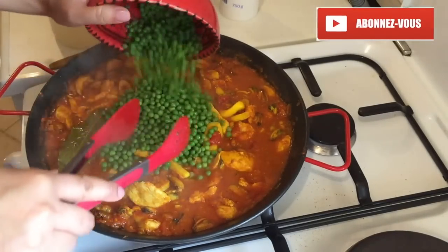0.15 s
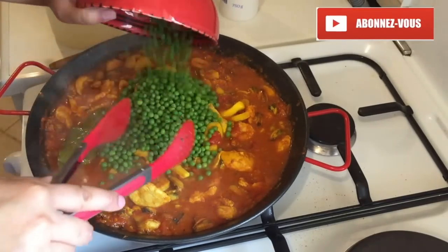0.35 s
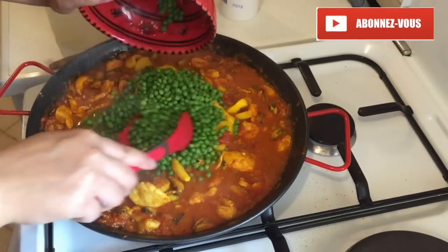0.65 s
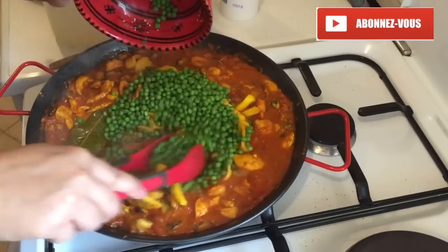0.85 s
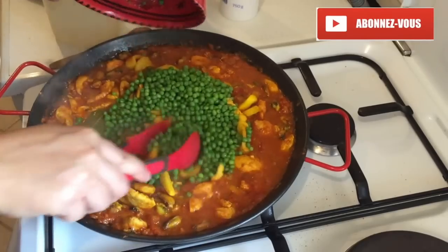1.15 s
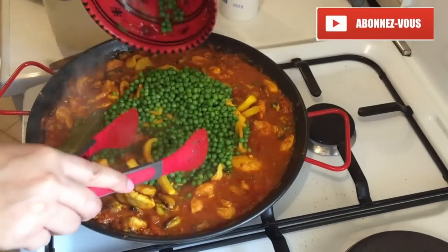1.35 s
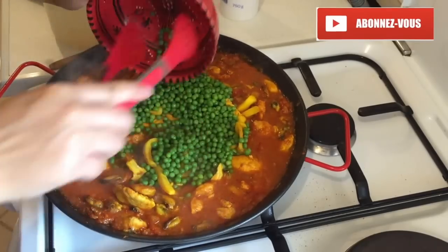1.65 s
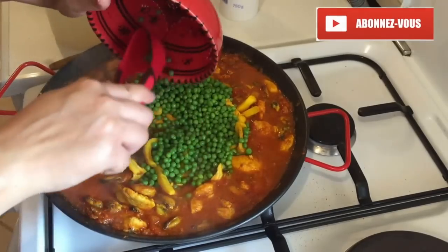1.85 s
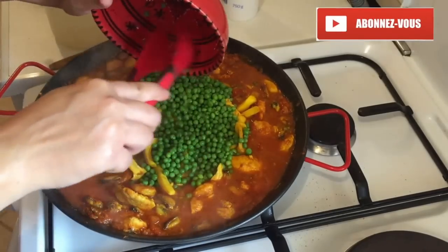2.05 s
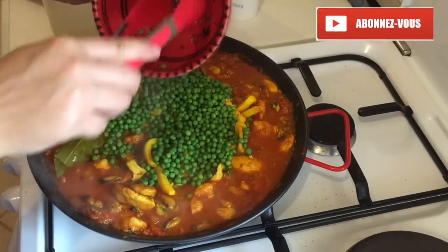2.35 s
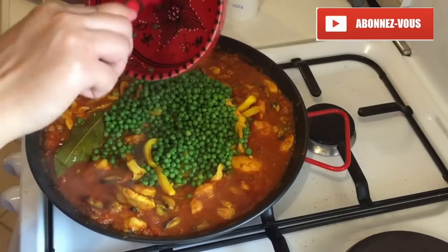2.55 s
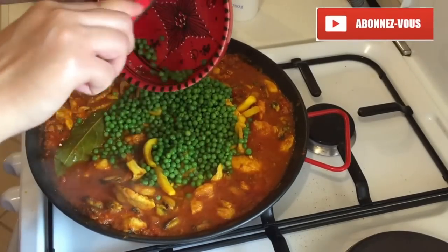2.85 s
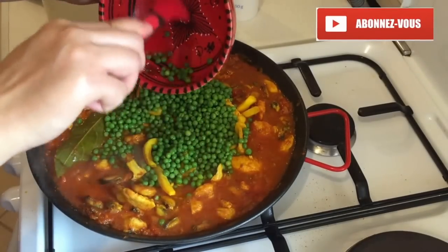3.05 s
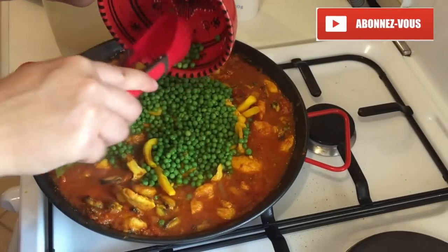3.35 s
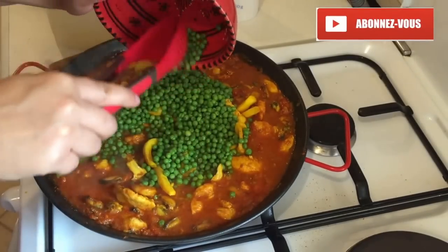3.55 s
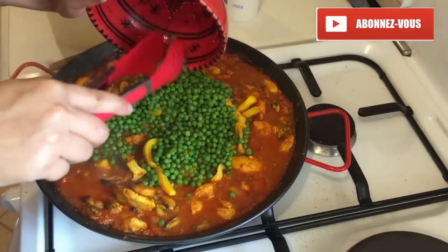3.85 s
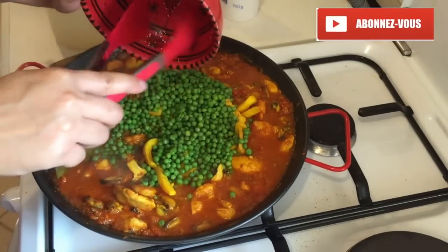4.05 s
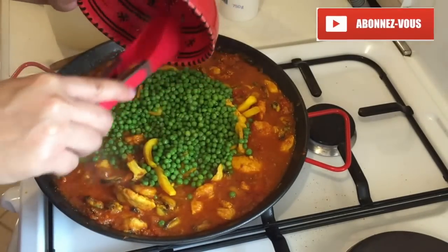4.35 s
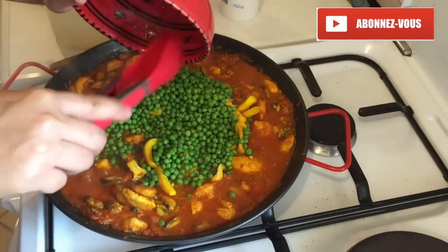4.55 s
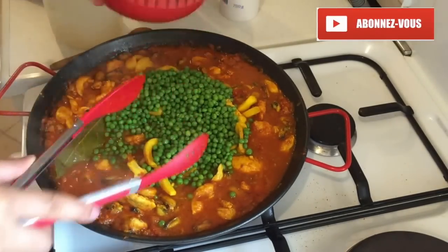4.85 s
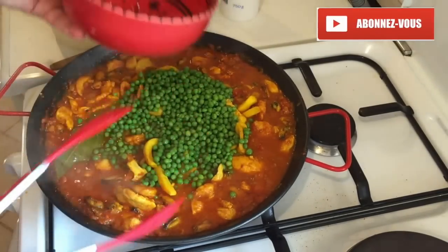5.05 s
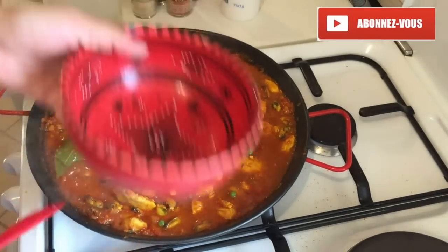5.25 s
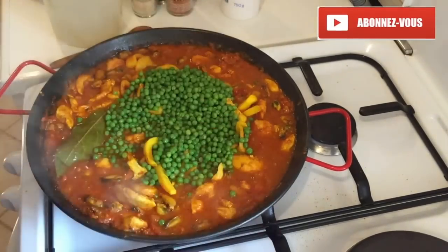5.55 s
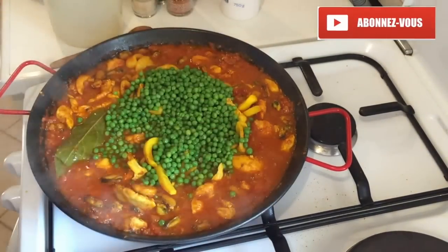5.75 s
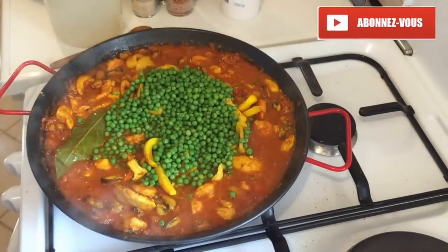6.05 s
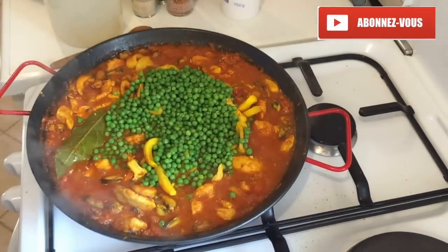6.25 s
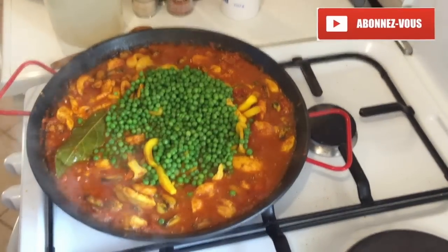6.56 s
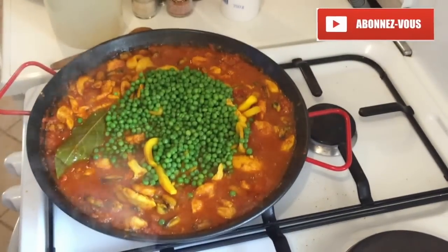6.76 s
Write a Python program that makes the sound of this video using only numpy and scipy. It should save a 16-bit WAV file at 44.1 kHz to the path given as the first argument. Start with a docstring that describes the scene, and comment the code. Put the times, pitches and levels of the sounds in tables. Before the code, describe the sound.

Over a gently fizzing pan, utensils clank on steel, thud in stew, then tap rapidly in a plastic colander before it is set down.

```python
"""Peas, tongs and a simmering pan

Peas are tipped from a plastic colander into a steel pan in a small kitchen. Silicone-tipped tongs stir, thud,
knock and pick out the last peas; then the utensils are put down on the worktop. Blows are decaying modes plus a
noise contact and a room tail; stew, squelch and a dull low rumble are shaped noise, grains and rising bubble
tones. A gas burner rushes and a fan hums."""
import sys
import numpy as np
from scipy import signal
from scipy.fft import rfft, irfft, next_fast_len
from scipy.io import wavfile
from scipy.ndimage import uniform_filter1d, map_coordinates

SR = 44100
rng = np.random.default_rng(int(sys.argv[2]) if len(sys.argv) > 2 else 0)


def generate_wav(signal):
    """Clip the signal to [-1, 1] and save it as 16-bit WAV at the path in sys.argv[1]."""
    frames = np.transpose(np.atleast_2d(signal))
    scaled = np.clip(frames, -1, 1) * 32767
    pcm = np.round(scaled).astype(np.int16)
    wavfile.write(sys.argv[1], SR, pcm)


N = 305172
TIME_S = np.arange(N) / SR
AGE_S = np.arange(SR // 2) / SR  # time since a blow
TOP_HZ = 16200

# Blows on the pan rim. Each row: start in seconds, level in dB, main mode in Hz, lightness (bass loss) and
# softness (treble loss) in dB per octave, relative ring in dB, ring time factor, relative rattle in dB,
# favoured modes as a list of (Hz, lift in dB).
RIM_BLOWS = [(0.3356, -17, 3700, 5.35, 9.2, -0.5, 1.18, 1.5, [(2980, 15), (4460, 7), (3472, -2),
             (4930, 5.5)]), (0.358, -32, 4520, 0.95, 6, -5, 1, -2, [(5930, 8), (4560, 7)]),
             (0.7243, -21, 1330, 1.6, 5.9, -6.5, .75, -23, [(1490, 6), (1112, 5), (1943, 3), (4888, 13.5),
             (7520, 12)]), (2.1068, -19.5, 4750, 2.1, 8.2, -1, 1.06, -33, [(275, 2), (1760, 13),
             (3004, 4.5), (3806, 3), (4560, 7), (5970, 6.5), (7500, 4.5), (8834, 8)]),
             (2.3437, -14, 3800, .3, 9.5, 3.5, 0.87, -15, [(2940, 10), (1943, 7.5), (3830, 6), (4900, 7),
             (6850, 7), (7520, 2.5), (9255, 7), (10010, 6)]),
             (2.359, -17.5, 1460, 2.9, 8.6, 0.5, 1, -25, [(178, 10), (533, 13), (764, 5.5), (1410, 6)]),
             (2.7019, -30, 1240, 5.4, 7.2, -5, 0.38, -25, [(1112, 16), (1370, 13)])]
# Cushioned blows on the pan floor. Each row: start in seconds, level in dB, main mode in Hz, softness in dB per octave.
FLOOR_BLOWS = [(0.339, -32.5, 110, 2.5), (0.664, -21, 335, 7), (1.41, -21.5, 296.2, 7.5),
               (1.45, -29, 316, 7), (1.412, -39, 784, 14), (1.473, -34.5, 795, 22),
               (1.824, -27.5, 245, 4.5), (1.852, -32.5, 240, 25), (2.331, -31.5, 240, 3),
               (2.362, -22, 176, 3)]
# Colander knocked, brushed and set down. Each row: start in seconds, level in dB, main mode in Hz, lightness and
# softness in dB per octave, ring time factor, relative room in dB, relative clack of the main mode in dB.
COLANDER_BLOWS = [(2.6995, -22.5, 726, 6, 4.4, 0.35, -4.5, 3), (5.372, -36.5, 650, -0.5, 9.6, 0.42, 4, -8),
                  (5.6435, -42, 780, 12, 4.4, 0.38, -12, 5), (6.4362, -18, 2020, 4, 7.6, 0.2, -2, 0.5),
                  (6.4403, -20, 890, 4.5, 13, 0.76, 0, 8), (6.446, -16, 191, -1, 4.3, 0.53, -4.5, 2),
                  (6.453, -23, 780, 9, 10, 0.46, -1, 6.5), (6.492, -21, 230, 4, 5.6, 0.27, -3, 6.5),
                  (6.6323, -13, 916, 6.5, 6.1, 0.61, -2.5, 0), (6.637, -22.5, 288, 11, 10, .6, -2, 8),
                  (6.654, -17.5, 624, 2, 6.5, 0.71, -4, 1), (6.683, -24, 600, -1, 7, 0.96, 2.5, 6),
                  (6.699, -27, 1736, 12, 13, 0.7, -3.5, 4.5),
                  (6.737, -29.5, 690, -0.5, 7.5, 0.45, -0.5, -3)]
# Light taps of the tongs. Each row: start in seconds, level in dB, pitch in Hz, relative snap in dB, t60 in seconds.
TONG_TAPS = [(0.5016, -24.5, 3530, -16, 0.0089), (1.3025, -26, 3120, -9, 0.0071),
             (1.5222, -25.5, 3940, -14, 0.0067), (1.89, -23.5, 3270, -12, 0.0034),
             (2.508, -24, 3070, -10.5, 0.0045), (2.588, -27.5, 5670, -19, 0.018),
             (2.609, -24, 1780, -22, 0.011), (2.698, -14.5, 5470, -16, 0.01),
             (2.9463, -19.5, 4000, -12.5, 0.0054), (3.233, -26.5, 1930, -27, 0.0088),
             (3.255, -25.5, 2100, -9, .005), (3.3107, -15.5, 4020, -9.5, 0.0063),
             (3.314, -16, 4830, -22, .006), (3.587, -22, 3000, -6, 0.0057), (3.7841, -20, 4600, -9, 0.0065),
             (3.7862, -19.5, 3040, -13, .009), (4.045, -24.5, 1310, -11, 0.0067),
             (4.127, -18, 5900, -18, 0.0062), (4.172, -26.5, 3500, -8, 0.005),
             (4.254, -10.5, 4140, -14, 0.0042), (4.3825, -25, 1350, -26, 0.012),
             (4.4724, -25, 6500, -8, 0.0044), (4.4755, -13, 3390, -11.5, 0.0063),
             (4.476, -22, 1050, -20, 0.011), (4.489, -11, 2110, -15.5, 0.0036),
             (4.4907, -11, 3430, -18, 0.0037)]
# Peas slide, stew is stirred. Each row: start in seconds, length in seconds, squelch in dB, fizz flare in dB.
STROKES = [(0, 0.036, -42, -56), (0.973, 0.08, -41, -42), (1.327, 0.035, -47.5, -62),
           (5.433, 0.04, -42.5, -50.5), (5.736, 0.22, -47, -46)]
# Dull low rumble swells unevenly. Each row: start in seconds, length in seconds, level in dB.
RUMBLE_SWELLS = [(5.37, 0.024, -38), (5.48, 0.04, -38.5), (5.565, 0.17, -39), (6.05, 0.033, -41),
                 (6.21, 0.036, -31)]
# Larger bubbles burst. Each row: start in seconds, level in dB, starting pitch in Hz.
PLOPS = [(1.008, -30, 6200), (1.218, -28, 8000), (4.98, -33, 1450), (5.485, -27, 1510), (5.503, -30, 1500),
         (5.645, -28, 2580), (5.833, -28.5, 1910)]

# Modes of the pan steel. Each row: frequency in Hz, relative level in dB, t60 in seconds at ring time factor 1.
STEEL_MODES = [(178, -6, .3), (275, -8, .28), (330, -14, .22), (533, -14, .28), (764, -7, .3),
               (953, -14, .3), (1112, -11, .32), (1254, -12, .28), (1370, -11, .36), (1425, -10, .24),
               (1490, -12, .3), (1760, -12, .22), (1943, -12, .2), (2170, -18, .28), (2590, -15, .2),
               (2950, -13, .24), (3004, -9, .37), (3214, -14, .14), (3348, -15, .18), (3472, -14, .2),
               (3709, -17, .15), (3806, -16, .42), (4517, -15, .2), (4554, -15, .3), (4822, -14, .22),
               (4888, -16, .24), (5950, -16, .26), (6850, -19, .22), (7520, -17, .28), (8834, -19, .23),
               (9255, -24, .28), (10010, -20, .2), (12000, -20, .17)]
# Short-lived modes of a rattling contact. Each row: frequency in Hz, relative level in dB, t60 in seconds.
RATTLE_MODES = [(3080, -5, .05), (3180, -10, 0.082), (3340, -1, 0.072), (3466, -0.5, 0.052),
                (3730, -10, 0.08), (3930, -7, .05), (4560, 0.5, .075), (5890, -7, 0.078), (6460, -9, .04),
                (7420, -8, 0.041), (9400, -14, .05)]
# Modes of the loaded pan floor. Each row: frequency in Hz, relative level in dB, t60 in seconds at ring time factor 1.
FLOOR_MODES = [(165.9, -2.5, 0.28), (243.7, -4, 0.21), (301.2, -2, 0.17), (334.7, -9, 0.2),
               (544.4, -13.5, 0.2), (768, -3, 0.042), (1126, -32, 0.22), (1460, -13, 0.23)]
# Modes of the colander shell. Each row: frequency in Hz, relative level in dB, t60 in seconds at ring time factor 1.
SHELL_MODES = [(148, 3.5, 0.38), (174.5, 5, .3), (216, 4.5, 0.34), (249, 8, 0.27), (287, 7.5, 0.22),
               (328.4, 5.5, .26), (544.5, -5, 0.44), (615.6, -1.5, 0.33), (788, -6.5, 0.22), (895, -6, 0.2),
               (967, -12, 0.39), (1224, -12.5, 0.43), (1490, -19, 0.24), (1700, -14, 0.37),
               (1905, -14, 0.25), (2036, -10, 0.22), (2440, -22, .25)]
# Modes of a tong tip. Each row: ratio to the tap pitch, relative level in dB.
TIP_MODES = [(1.002, 1.5), (1.112, -5.5), (0.754, -7.5), (1.55, -9.5)]

# Contact spectra. Each row: frequency in Hz, relative level in dB.
RIM_CONTACT = [(30, -24), (90, -19), (130, 4), (420, -3), (700, 3), (1000, 2), (1500, 4), (2200, -4),
               (3300, -3), (7000, -11), (16000, -19)]
FLOOR_CONTACT = [(40, -34), (90, -8), (150, 11.5), (450, -8.5), (800, -10.5), (1400, 1), (2500, -14), (16000, -22)]
SHELL_CONTACT = [(30, -11.0), (90, 9), (140, 11.0), (300, 9.5), (420, -3.0), (650, 8.0), (900, 1.5),
                 (1300, -3.5), (2000, -6.5), (2700, -5.5), (4000, -3.5), (7000, -17.5), (16000, -64)]
# Spectrum of the opening tongs. Each row: frequency in Hz, relative level in dB.
RUSTLE_SPECTRUM = [(200, -10), (600, -1), (1600, -5), (2400, 2.5), (3200, 1), (4500, -3), (7000, -9),
                   (11000, -12), (16000, -20)]
# Spectrum of wet stirring. Each row: frequency in Hz, relative level in dB.
SQUELCH_SPECTRUM = [(100, 5), (220, 13), (450, 1.5), (750, -5.5), (1400, 6), (2200, -2), (5000, -4),
                    (9000, -13), (16000, -42)]
# Spectrum of the dull rumble. Each row: frequency in Hz, relative level in dB.
RUMBLE_SPECTRUM = [(25, 6.5), (60, 0), (130, 5.5), (280, -2), (450, -13), (750, -3.5), (1500, -18.5),
                   (5000, -29.5)]
# Spectrum shared by burner and stew. Each row: frequency in Hz, relative level in dB.
SIMMER_SPECTRUM = [(25, -4.5), (80, -8), (130, -2), (320, 5), (420, 1.5), (620, 1), (720, 4), (1350, 1.5),
                   (1700, -2), (3800, -7), (6000, -9.5), (8000, -13.5), (12000, -17.5), (16000, -27)]
# Narrow bands of hiss. Each row: centre in Hz, width in Hz, relative level in dB.
HISS_BANDS = [(3980, 280, 4.5), (8995, 215, 2), (9860, 160, -5.5), (13230, 200, 6)]
# Fan lines. Each row: frequency in Hz, level in dB before the swell.
HUM_LINES = [(150, -56.5), (179, -47), (200, -49)]
# Swell of the hum. Each row: time in seconds, gain in dB.
HUM_SWELL = [(0, -4), (2, -5.5), (4.2, -2.5), (5.5, -7), (6.9, -3)]
# Decay of the kitchen. Each row: frequency in Hz, t60 in seconds.
KITCHEN_T60 = [(100, 0.44), (400, 0.38), (1200, 0.44), (4000, 0.3), (12000, 0.093)]
# Bands that slope a blow. Each row: lower edge in Hz, upper edge in Hz.
SLOPE_BANDS_HZ = [(40, 400), (400, 1000), (1000, 2500), (2500, 6000), (6000, 16000)]
# Centres of the slope bands, in Hz.
SLOPE_CENTRES_HZ = [200, 630, 1600, 3900, 9800]
# A worktop reflection cancels part of each blow. Columns: lower edge in Hz, upper edge in Hz, share removed.
WORKTOP_NOTCH = (410, 418, .65)
# A standing wave thins the bass at the microphone. Columns: lower edge in Hz, upper edge in Hz, share removed.
BASS_NULL = (68, 87, .55)

FLOOR_LIGHTNESS_DB_PER_OCTAVE = 3.5
FOCUS_HALF_WIDTH_OCTAVES = 0.44
TWIN_SPLIT_RATIO, TWIN_SHARE = .005, .33
CLACK_T60_S, CLACK_ONSET_T60_S = 0.031, 0.0021
SNAP_T60_S, SNAP_ONSET_T60_S, TAP_ROOM_DB = 0.0087, 0.0012, -6.5
RUSTLE_START_S, RUSTLE_DB, RUSTLE_T60_S, RUSTLE_ONSET_T60_S = 5.102, -25.5, 0.36, 0.0077
STROKE_RISE_TAU_S, STROKE_FALL_TAU_S = 0.28, 0.25
RUMBLE_RISE_TAU_S, RUMBLE_FALL_TAU_S = 0.012, 0.044
FIZZ_BASE_DB, FLARE_RISE_TAU_S, FLARE_FALL_TAU_S = -47, 0.18, 0.21


def clanks():
    """Hard rim blows ring the steel in beating pairs of modes; rattle is added at each blow's own level."""
    out = np.zeros(N)
    twins = [(hz * (1 - TWIN_SPLIT_RATIO), db, t60_s) for hz, db, t60_s in STEEL_MODES]
    for start_s, db, main_hz, lightness, softness, ring_db, stretch, rattle_db, favoured in RIM_BLOWS:
        steel = ring(STEEL_MODES, 1, favoured, stretch, blur=.4)
        steel = steel + TWIN_SHARE * ring(twins, 1, favoured, stretch, blur=.4)
        steel = amp(ring_db) * steel * (1 + amp(5.0) * fade(0.053))  # stronger at first
        rattle = amp(rattle_db + 8) * ring(RATTLE_MODES, 1, blur=.8)
        contact = amp(10) * crack(.024, RIM_CONTACT)
        reply = room(amp(-1) * contact + amp(-4) * rattle + amp(-11) * steel)
        blow = steel + rattle + contact + reply
        add(out, start_s, amp(db) * voiced(blow, main_hz, lightness, softness, focus_db=-2))
    return out


def thuds():
    """Soft contacts push through the stew and boom the damped modes of the pan floor."""
    out = np.zeros(N)
    for start_s, db, main_hz, softness in FLOOR_BLOWS:
        boom = ring(FLOOR_MODES, 1.4, [(main_hz, 11)], stretch=0.97, blur=0.54) * (1 - fade(0.0083))
        contact = amp(-8.0) * crack(0.11, FLOOR_CONTACT)
        blow = boom + contact + room(amp(1.0) * contact + amp(-38) * boom)
        voiced_blow = voiced(blow, main_hz, FLOOR_LIGHTNESS_DB_PER_OCTAVE, softness, focus_db=-10.0)
        add(out, start_s, amp(db) * voiced_blow)
    return out


def knocks():
    """The plastic shell clacks; a firm grip shortens its ring and the room carries it on."""
    out = np.zeros(N)
    for start_s, db, main_hz, lightness, softness, stretch, room_db, clack_db in COLANDER_BLOWS:
        shell = ring(SHELL_MODES, 1.5, [(main_hz, 5)], stretch=stretch, blur=.4)
        contact = amp(7.5) * crack(0.029, SHELL_CONTACT)
        reply = room(amp(4.0) * contact + amp(-16.0) * shell)
        blow = shell + contact + amp(room_db) * reply
        tone = np.sin(2 * np.pi * main_hz * AGE_S)
        clack = amp(clack_db + 9) * tone * fade(CLACK_T60_S) * (1 - fade(CLACK_ONSET_T60_S))
        knock = voiced(blow, main_hz, lightness, softness, focus_db=-15.5)
        add(out, start_s, amp(db) * (knock + clack + amp(-9.0) * room(clack)))
    return out


def taps():
    """Tong tips click in the colander: short modes and a bright noise snap."""
    out = np.zeros(N)
    for start_s, db, pitch_hz, snap_db, t60_s in TONG_TAPS:
        ping = ring([(pitch_hz * ratio, mode_db, t60_s) for ratio, mode_db in TIP_MODES], 0.93)
        noise = rng.standard_normal(len(AGE_S)) * fade(SNAP_T60_S)
        snap = amp(snap_db + 13.5) * band(noise, 1400, 8000, order=1)
        tap = amp(db) * (ping + snap) * (1 - fade(SNAP_ONSET_T60_S))
        add(out, start_s, tap + amp(TAP_ROOM_DB) * room(band(tap, 500, 8600, order=1)))
    return out


def rustle():
    """The tongs spring open in a short, diffuse scrape of random grains."""
    out = np.zeros(N)
    grains = coloured(pops(rate_hz=1500, spread_db=4), RUSTLE_SPECTRUM)[:len(AGE_S)]
    envelope = fade(RUSTLE_T60_S) * (1 - fade(RUSTLE_ONSET_T60_S))
    add(out, RUSTLE_START_S, amp(RUSTLE_DB) * grains * envelope)
    return out


def stirring(count=2400):
    """Wet peas slide and squelch in clumps of tiny bursting air pockets."""
    pockets = np.zeros(N)
    for when, pitch, size in rng.random((count, 3)):
        add(pockets, when * (N - 1) / SR, amp(16 * size ** 3) * plip(450 * 16 ** pitch, 7))
    grains = unit(pockets + room(pockets)) + amp(-4) * patchy(rng.standard_normal(N), 3)
    clumps_db = 2 * wobble(25)
    rows = [(start_s, length_s, db) for start_s, length_s, db, _ in STROKES]
    motion = swells(rows, STROKE_RISE_TAU_S, STROKE_FALL_TAU_S)
    return motion * amp(clumps_db) * coloured(grains, SQUELCH_SPECTRUM)


def dull_rumble():
    """Dull low noise that swells and falls with an uneven level."""
    motion = swells(RUMBLE_SWELLS, RUMBLE_RISE_TAU_S, RUMBLE_FALL_TAU_S)
    bumps_db = 2.5 * wobble(30)
    return motion * amp(bumps_db) * coloured(rng.standard_normal(N), RUMBLE_SPECTRUM)


def simmer():
    """The flame rushes in the lows while the sauce fizzes in the highs, more so when disturbed."""
    lows = lambda hz: 1 / (1 + (hz / 1700) ** 4)
    highs = lambda hz: 1 - lows(hz)
    flame = patchy(filtered(coloured(rng.standard_normal(N), SIMMER_SPECTRUM), lows), 1.5)
    froth = rng.standard_normal(N) + amp(3.5) * pops(rate_hz=450, spread_db=5.0)
    fizz = patchy(filtered(coloured(froth, SIMMER_SPECTRUM), highs), 1.8)
    flutter_db = .7 * wobble(20)
    rows = [(start_s, length_s, db) for start_s, length_s, _, db in STROKES]
    flare = swells(rows, FLARE_RISE_TAU_S, FLARE_FALL_TAU_S)
    fizz_gain = np.hypot(amp(FIZZ_BASE_DB), flare) * amp(0.86 * wobble(11))
    return amp(-43.5 + flutter_db) * flame + fizz_gain * fizz + bubbles()


def bubbles(count=600):
    """Single bubbles plip in the sauce as short rising tones; most are faint, a few plop."""
    out = np.zeros(N)
    for when, pitch, size in rng.random((count, 3)):
        add(out, when * (N - 1) / SR, amp(-46 + 13 * size ** 3) * plip(700 * 9 ** pitch, 14))
    for start_s, db, hz in PLOPS:
        add(out, start_s, amp(db) * plip(hz, cycles=22))
    return out + amp(-7) * room(out)


def background():
    """A fan hums in lines of wandering level and phase under a thin high hiss."""
    def line(hz):
        level = amp(3 * wobble(11)) * np.sqrt(2)
        return level * np.sin(2 * np.pi * hz * TIME_S + 1.1 * wobble(10))

    hum = sum(amp(db) * line(hz) for hz, db in HUM_LINES)
    swell = amp(np.interp(TIME_S, *np.transpose(HUM_SWELL)))
    narrow = lambda f: sum(amp(db) / (1 + (2 * (f - hz) / width_hz) ** 2) for hz, width_hz, db in HISS_BANDS)
    hiss = amp(-51.5) * unit(filtered(rng.standard_normal(N), narrow))
    return swell * hum + hiss


def ring(modes, scatter_db, favoured=(), stretch=1, blur=0.63, size=25):
    """Decaying modes at new strengths for every blow; shifting load and grip blur their pitch."""
    hz, db, t60_s = np.transpose(modes)
    db = db + scatter_db * rng.standard_normal(len(hz))
    for centre_hz, lift_db in favoured:
        db = db + lift_db / (1 + (45 * (hz / centre_hz - 1)) ** 2)
    steps = rng.standard_normal((len(hz), len(AGE_S) // size + 1))
    waver = np.repeat(steps, size, axis=1)[:, :len(AGE_S)]
    drift = blur * np.cumsum(waver, axis=1) / np.sqrt(0.0086 * SR * size)  # random walk of phase
    phase = rng.uniform(0, 2 * np.pi, (len(hz), 1)) + drift + 2 * np.pi * hz[:, None] * AGE_S
    tones = np.sin(phase.astype(np.float32)) * fade(stretch * t60_s[:, None])
    return np.sum(amp(db)[:, None] * tones, axis=0)


def crack(t60_s, spectrum):
    """The contact itself: countless modes that die at once, as decaying coloured noise."""
    return coloured(rng.standard_normal(len(AGE_S)), spectrum) * fade(t60_s)


def voiced(blow, main_hz, lightness, softness, focus_db):
    """A blow peaks at its favoured mode; a light touch loses bass below it, a soft one treble above."""
    levelled = lambda part: part / np.std(part[:round(.03 * SR)])  # by the first 30 ms
    octaves = np.log2(np.divide(SLOPE_CENTRES_HZ, main_hz))
    loss_db = softness * np.maximum(octaves, 0) + lightness * np.maximum(-octaves, 0)
    sloped = sum(amp(-db) * levelled(band(blow, lo, hi)) for (lo, hi), db in zip(SLOPE_BANDS_HZ, loss_db))
    notch_lo_hz, notch_hi_hz, share = WORKTOP_NOTCH
    sloped = sloped - share * band(sloped, notch_lo_hz, notch_hi_hz, order=1)
    half_width = 2 ** FOCUS_HALF_WIDTH_OCTAVES
    return sloped + amp(focus_db) * band(sloped, main_hz / half_width, main_hz * half_width, order=1)


def room(x, build_up_s=0.00067):
    """The kitchen's answer: a diffuse tail that builds up as the first walls reply."""
    hz, t, z = signal.stft(rng.standard_normal(len(AGE_S)), SR, nperseg=256)
    z = z * np.exp(-np.log(1000) * t / along(KITCHEN_T60, hz)[:, None])
    tail = signal.istft(z, SR, nperseg=256)[1][:len(AGE_S)]
    tail = tail * (1 - np.exp(-(AGE_S / build_up_s) ** 2))
    return signal.fftconvolve(x, tail / np.linalg.norm(tail))[:len(x)]


def pops(rate_hz, spread_db):
    """Tiny bursts at random moments, a few much larger than the rest, heard in the room."""
    size = amp(spread_db * np.minimum(rng.exponential(size=N), 4))
    grains = (rng.random(N) < rate_hz / SR) * size * rng.choice([-1, 1], N)
    return unit(grains + amp(3.0) * room(grains))


def plip(hz, cycles):
    """One bubble: a short decaying tone that rises in pitch from hz."""
    t = AGE_S[:int(2 * cycles * SR / hz)]
    tone = np.sin(2 * np.pi * hz * t * (1 + 0.9 * t))
    return tone * np.exp(-3 * t * hz / cycles) * (1 - np.exp(-t * hz))


def swells(rows, rise_tau_s, fall_tau_s):
    """Gain of overlapping gestures (start s, length s, dB): each rises, holds and dies away."""
    def shape(start_s, length_s):
        before = np.maximum(start_s - TIME_S, 0)
        after = np.maximum(TIME_S - start_s - length_s, 0)
        return np.exp(-before / rise_tau_s - after / fall_tau_s)

    return np.sqrt(sum((amp(db) * shape(start_s, length_s)) ** 2 for start_s, length_s, db in rows))


def patchy(x, depth_db):
    """x at rms 1, with gains that drift independently in patches of about 500 Hz by 50 ms."""
    z = signal.stft(x, nperseg=512)[2]
    field = uniform_filter1d(rng.standard_normal(z.shape), size=6, axis=0)
    field = uniform_filter1d(field, size=9, axis=1)
    return unit(signal.istft(z * amp(depth_db * unit(field)), nperseg=512)[1][:len(x)])


def wobble(rate_hz):
    """A smooth random curve with rate_hz knots a second."""
    return map_coordinates(rng.standard_normal(int(N * rate_hz / SR) + 4), [TIME_S * rate_hz])


def fade(t60_s):
    """A decay of 60 dB in t60_s seconds."""
    return np.exp(-np.log(1000) * AGE_S / t60_s)


def amp(db):
    """Decibels to gain."""
    return 10 ** (np.asarray(db) / 20)


def unit(x):
    """x at rms 1."""
    return x / np.sqrt(np.mean(x ** 2) + 1e-20)


def along(points, hz):
    """(Hz, value) points interpolated on a log frequency axis."""
    f, v = np.transpose(points)
    return np.interp(np.log(hz + 1), np.log(f + 1), v)


def filtered(x, response):
    """x times a response of frequency."""
    m = next_fast_len(len(x) + SR // 4)
    return irfft(rfft(x, m) * response(np.fft.rfftfreq(m, 1 / SR)), m)[:len(x)]


def coloured(x, spectrum):
    """x shaped by the given spectrum, at rms 1."""
    return unit(filtered(x, lambda hz: amp(along(spectrum, hz))))


def band(x, lo_hz, hi_hz, order=3):
    """Causal band-pass."""
    sos = signal.butter(order, [lo_hz, min(hi_hz, TOP_HZ)], "bandpass", fs=SR, output="sos")
    return signal.sosfilt(sos, x)


def add(track, start_s, sound):
    """Mix a sound in at start_s seconds."""
    i = round(start_s * SR)
    track[i:i + len(sound)] += sound[:N - i]


def scene():
    """All sources summed to one channel."""
    blows = clanks() + thuds() + knocks() + taps() + rustle()
    return (blows + simmer() + background() + stirring() + dull_rumble())[None]


def record(dry):
    """The microphone loses deep bass, flattens peaks near full scale and keeps nothing above TOP_HZ."""
    heard = signal.sosfilt(signal.butter(4, 44, "highpass", fs=SR, output="sos"), dry[0])
    null_lo_hz, null_hi_hz, share = BASS_NULL
    heard = heard - share * band(heard, null_lo_hz, null_hi_hz, order=1)
    flattened = heard / (1 + np.abs(heard / .97) ** 12) ** (1 / 12)
    return filtered(flattened, lambda hz: hz < TOP_HZ)[None]


dry = scene()
out = record(dry)
generate_wav(out)
```